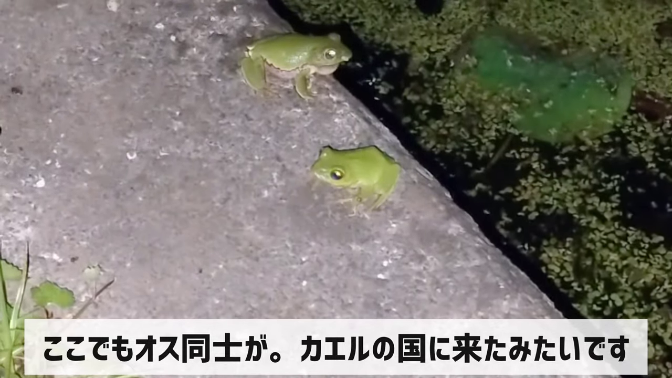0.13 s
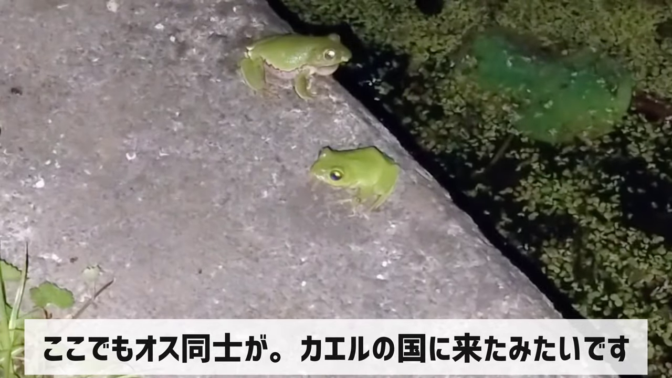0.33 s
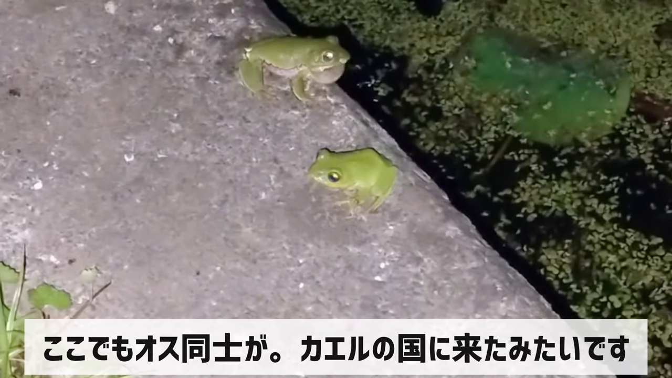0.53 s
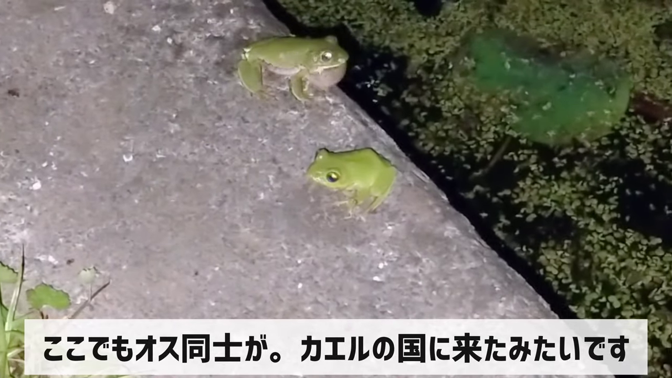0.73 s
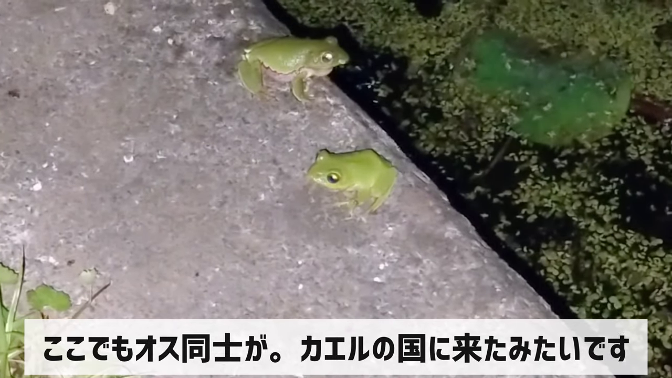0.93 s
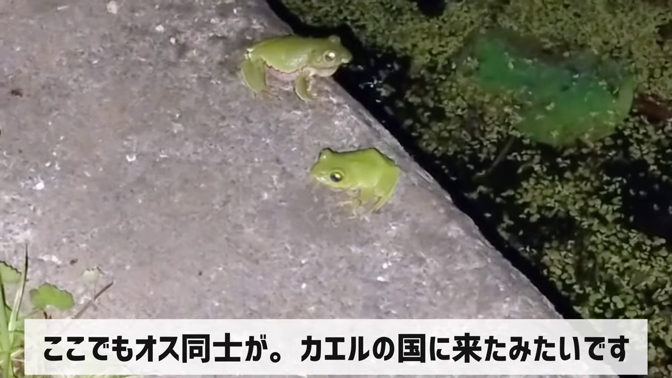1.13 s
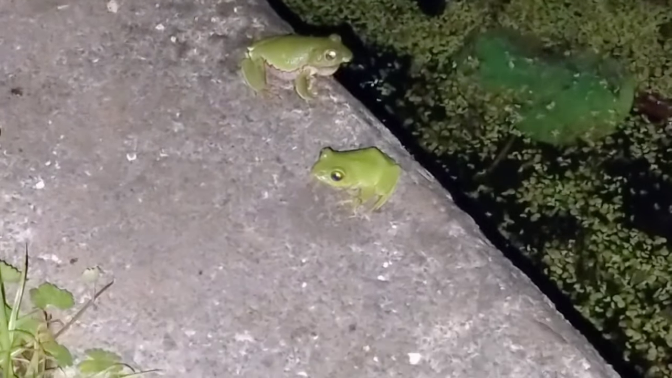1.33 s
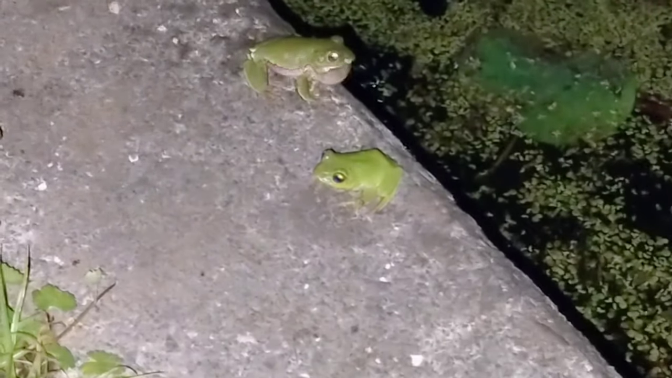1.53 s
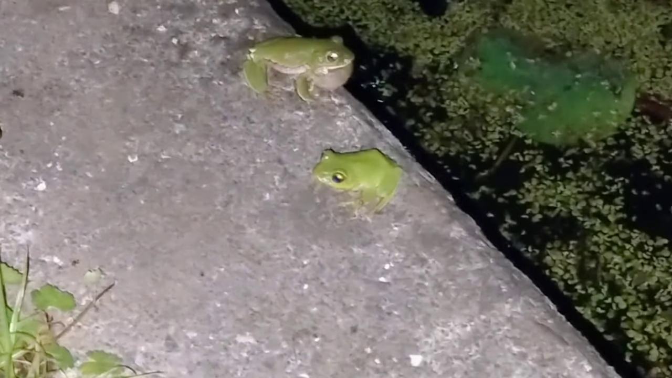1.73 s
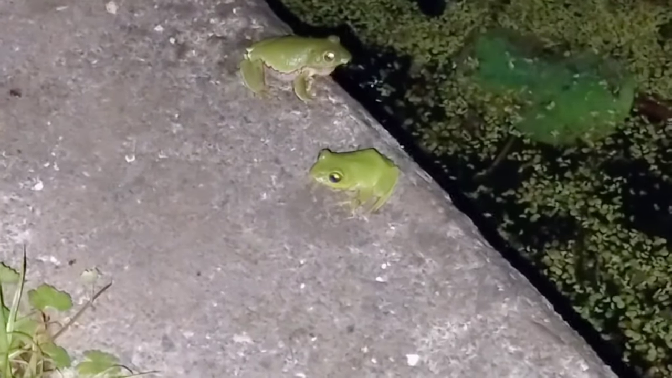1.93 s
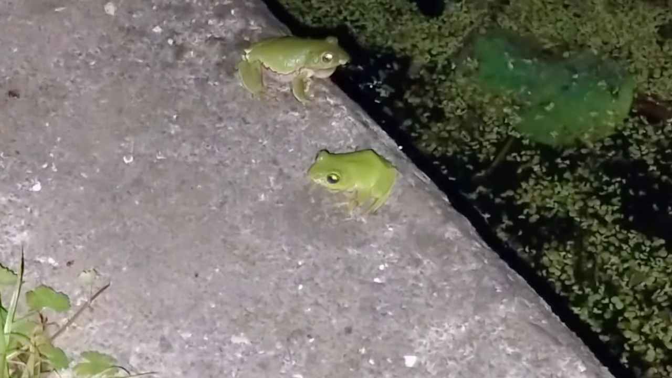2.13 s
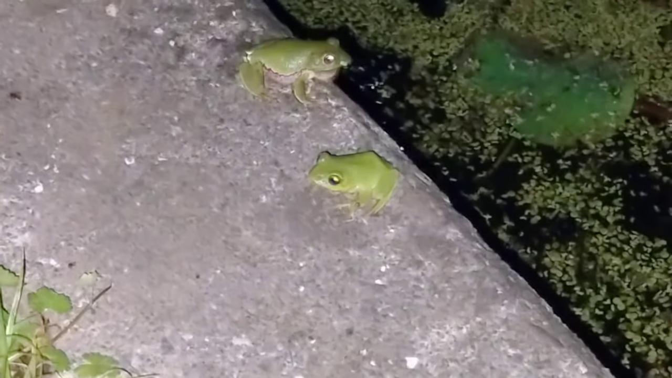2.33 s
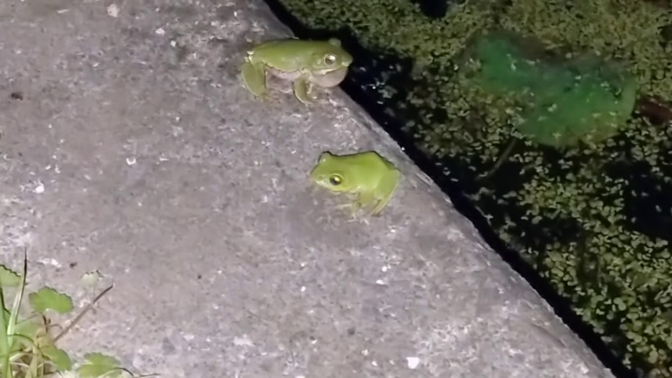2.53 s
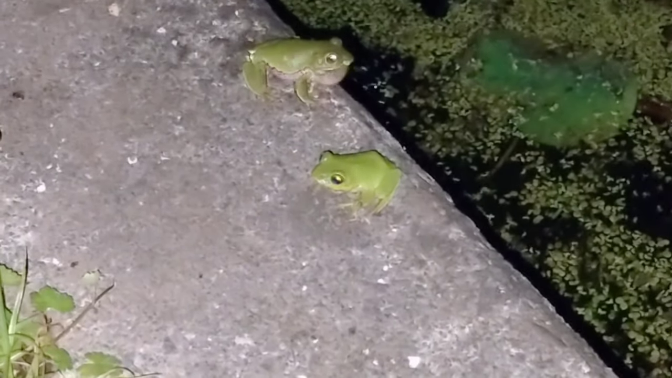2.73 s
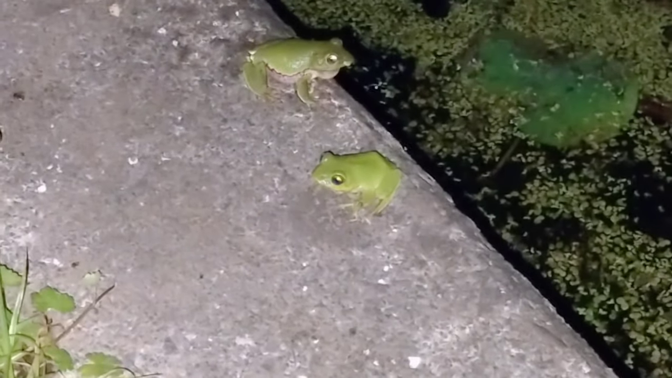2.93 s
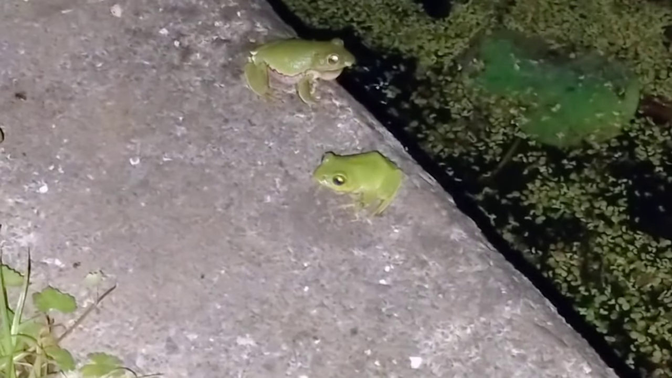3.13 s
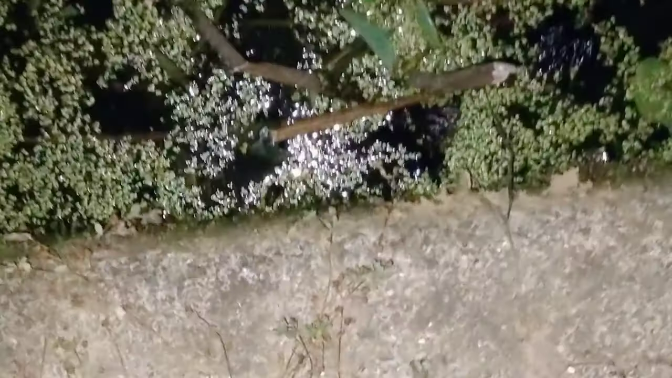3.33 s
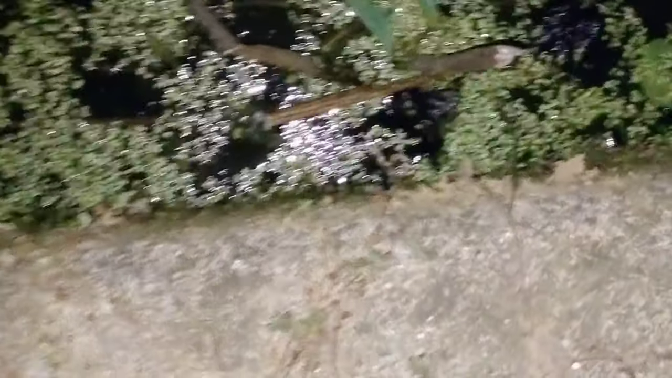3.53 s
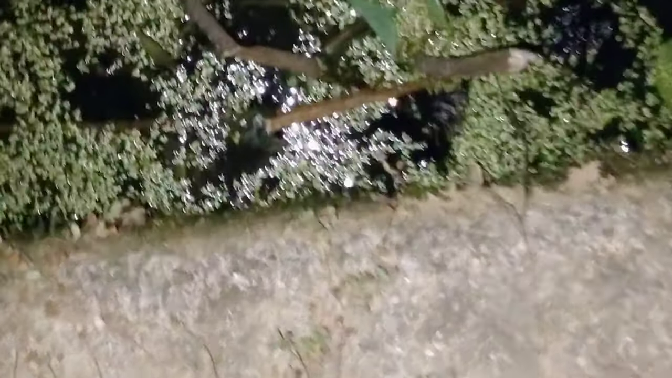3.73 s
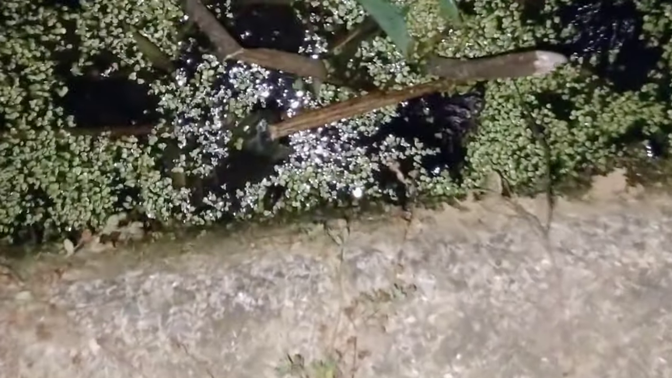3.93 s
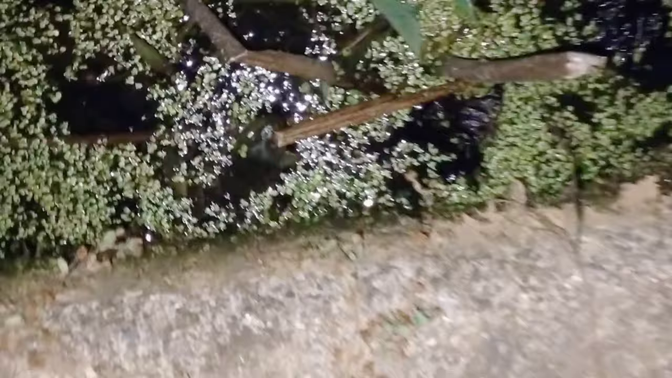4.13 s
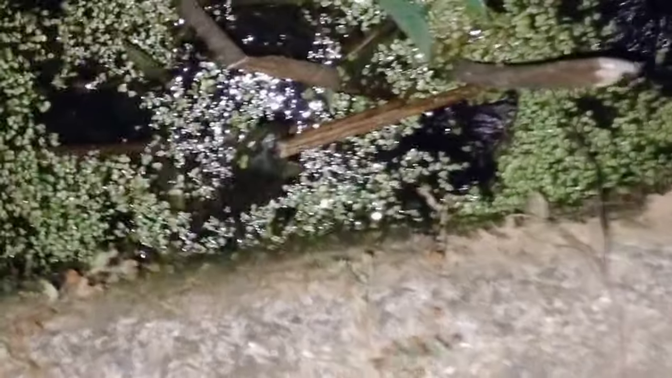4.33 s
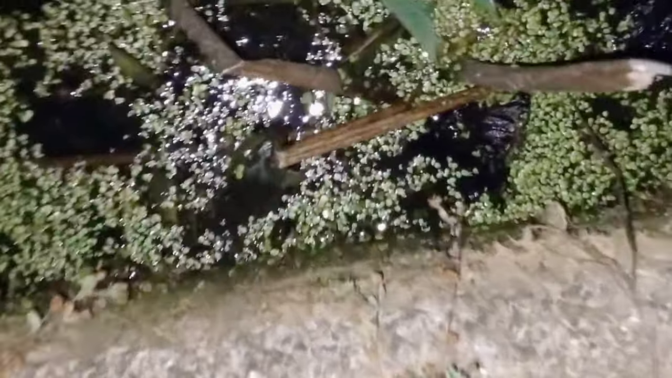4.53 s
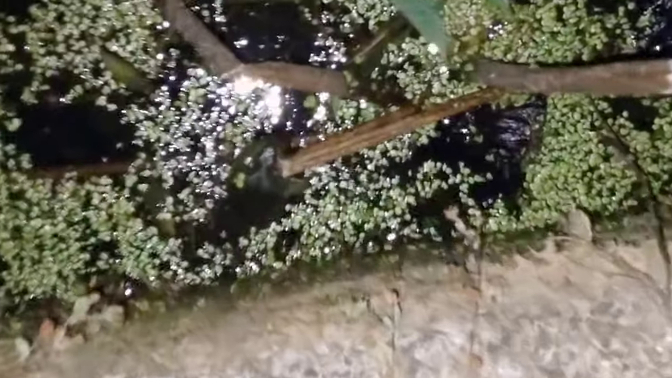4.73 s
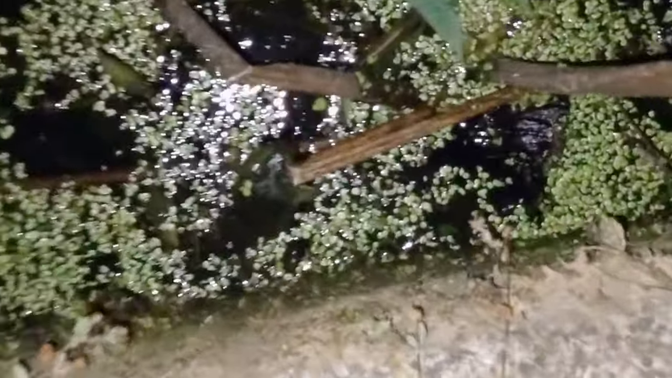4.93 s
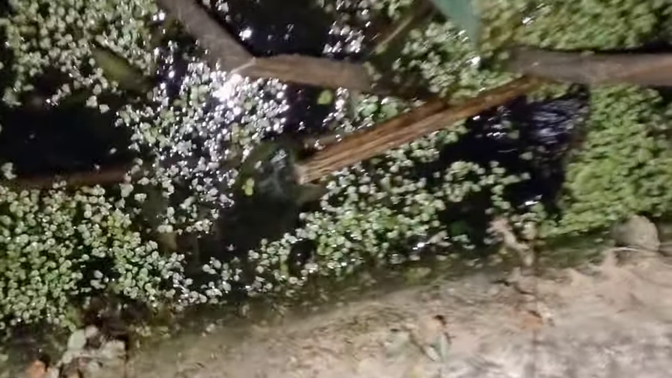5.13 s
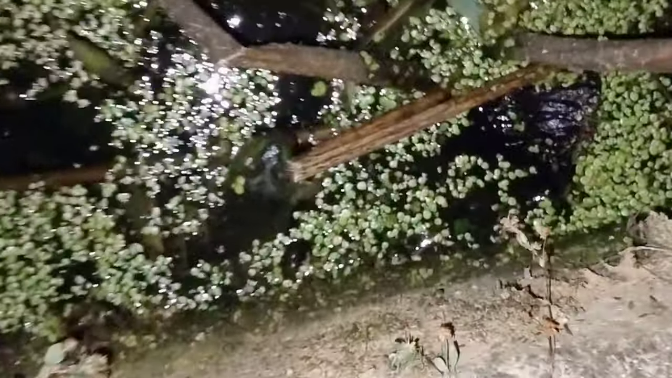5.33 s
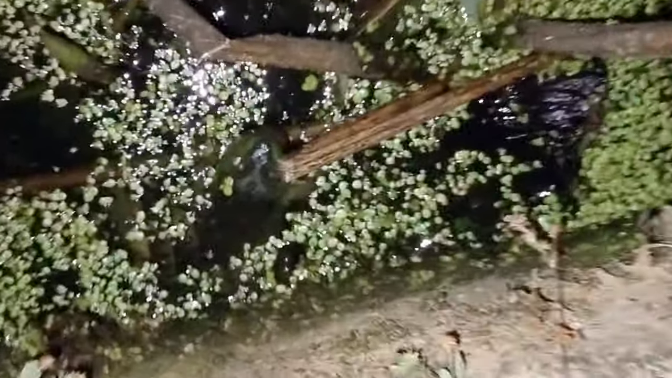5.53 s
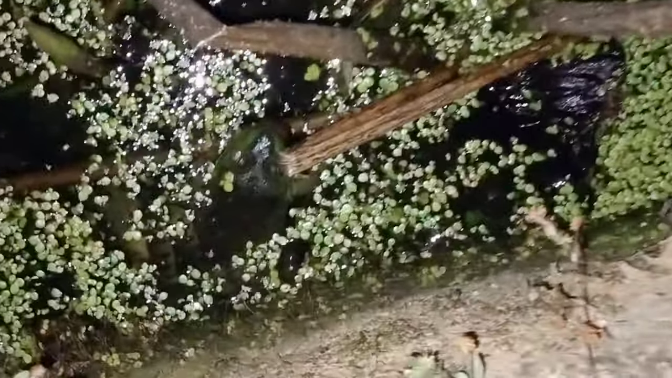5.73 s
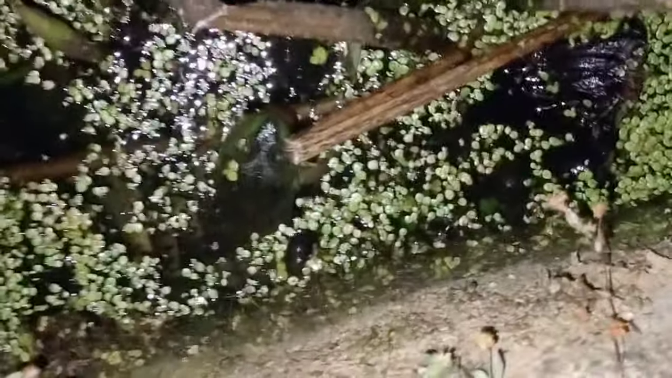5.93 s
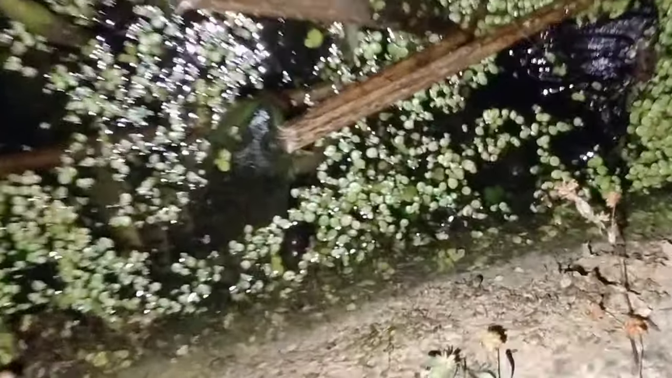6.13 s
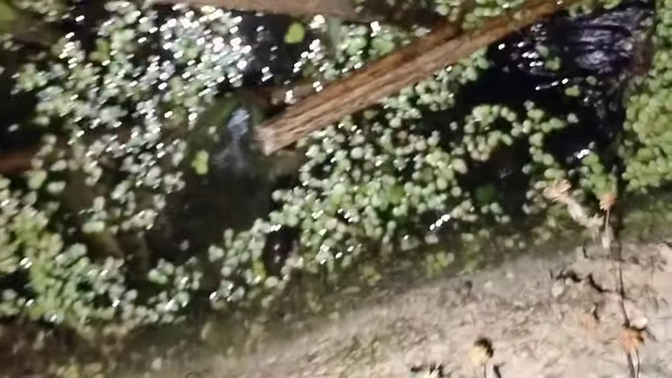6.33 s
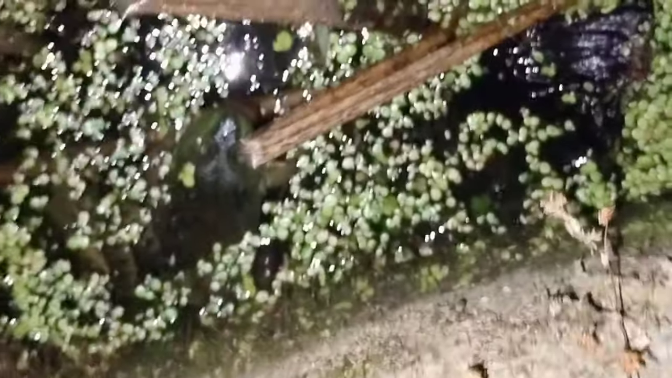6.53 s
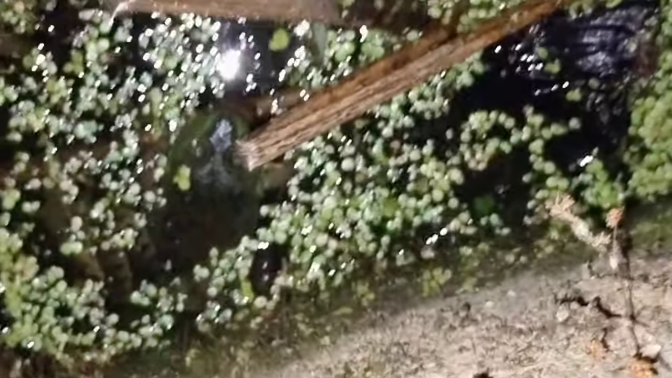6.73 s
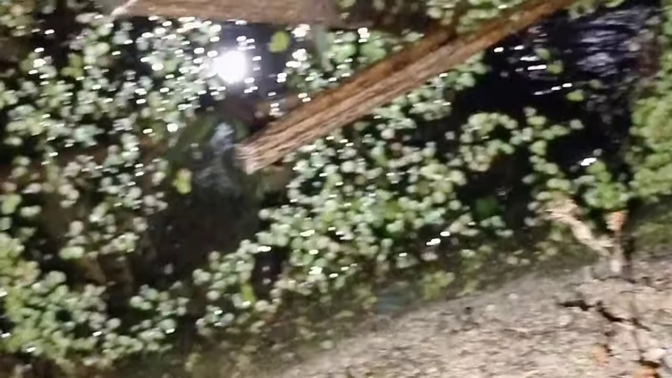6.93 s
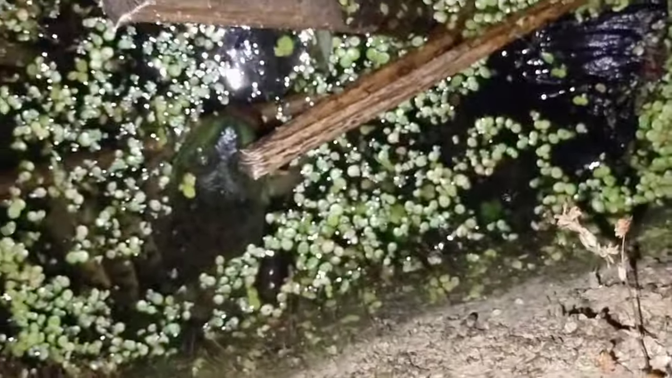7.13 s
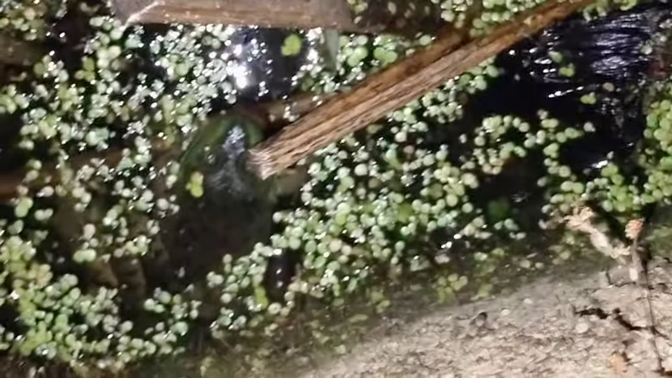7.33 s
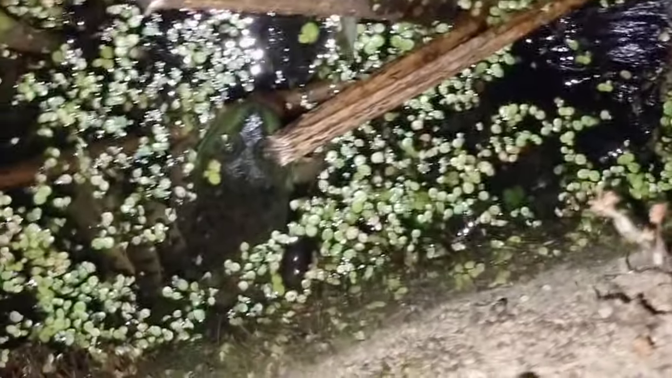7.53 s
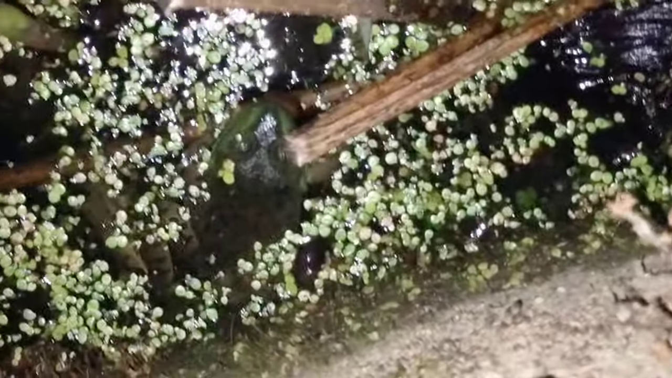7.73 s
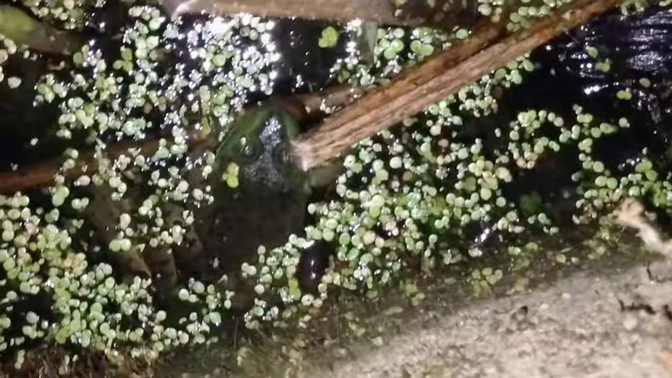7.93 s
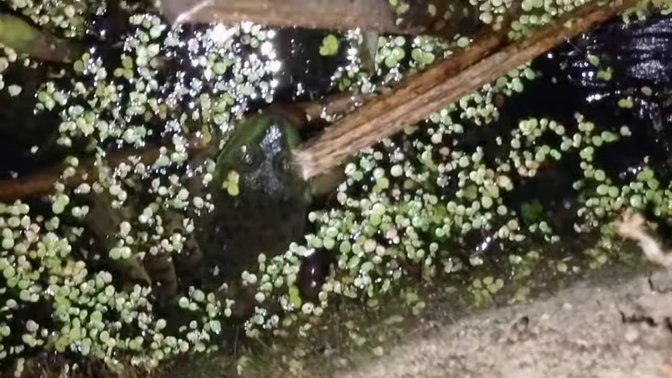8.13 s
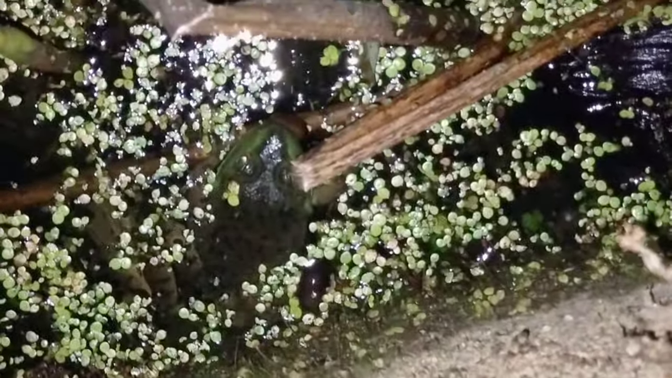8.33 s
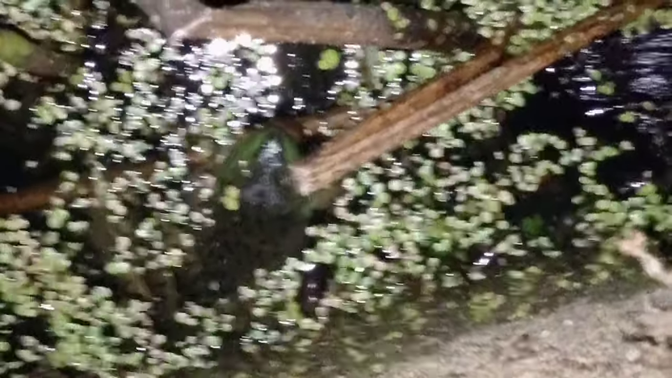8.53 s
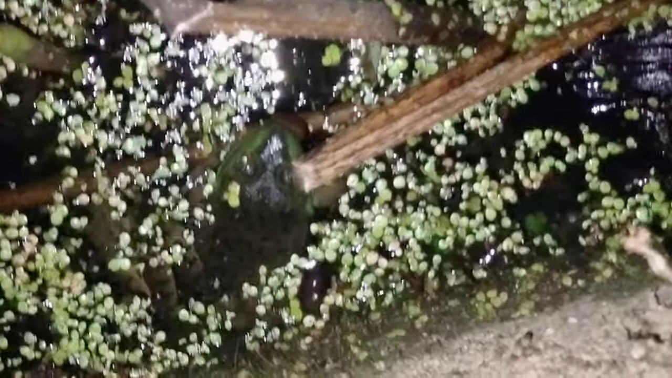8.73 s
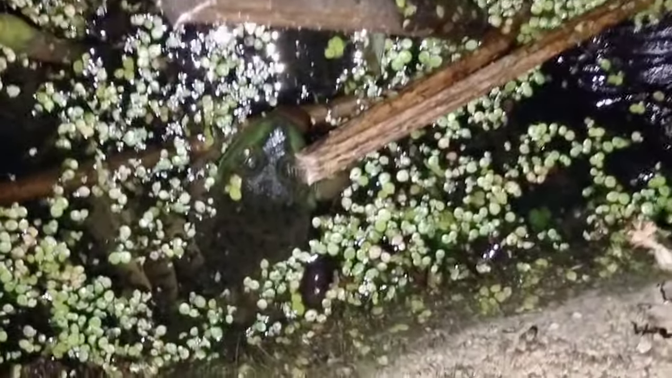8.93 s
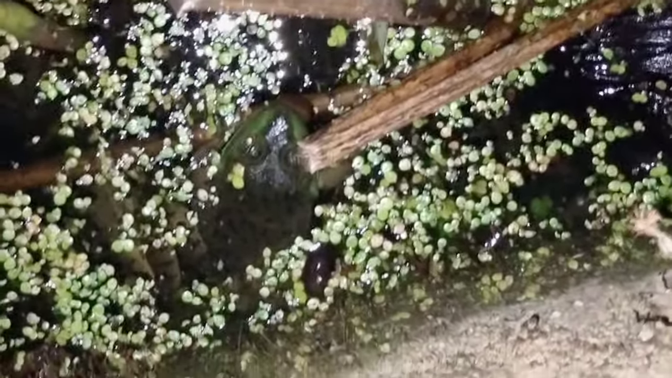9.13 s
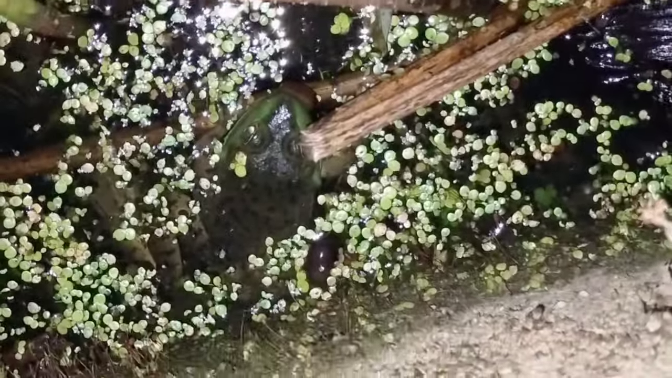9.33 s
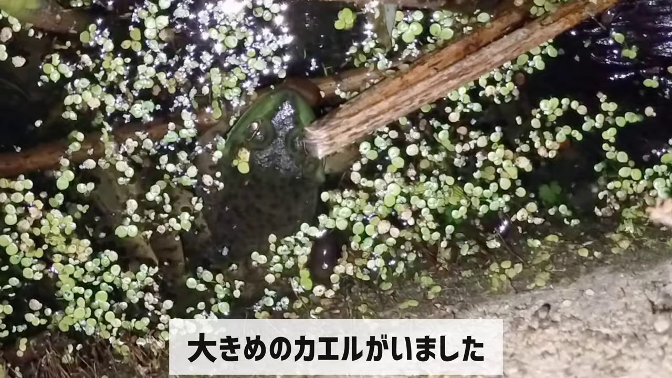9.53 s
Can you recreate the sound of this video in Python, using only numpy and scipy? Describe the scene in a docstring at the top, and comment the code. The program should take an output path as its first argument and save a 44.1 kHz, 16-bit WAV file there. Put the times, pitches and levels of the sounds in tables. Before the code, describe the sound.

A tree frog rattles loudly beside the microphone, a rival answering in its pauses, then the view shifts to neighbouring frogs over a dense night chorus.

```python
"""Night at a pond, first from its concrete bank: a tree frog rattles right at the microphone, a rival calls in his pauses.
Neighbours a few metres off join in, and a far chorus fills the air throughout, over still night air.
At 3.35 s a click marks the cut to a place over weedy water: a soft hiss and low rush swell and fade there,
among knocks, ticks, thumps and low notes; late on, a bigger frog calls once.
Every frog call is a train of short pulses, a sum of quickly dying vocal sac resonances."""
import sys
import numpy as np
from scipy import signal
from scipy.fft import rfft, irfft, next_fast_len
from scipy.io import wavfile
from scipy.ndimage import uniform_filter1d

SR = 44100
rng = np.random.default_rng(int(sys.argv[2]) if len(sys.argv) > 2 else 0)


def materialize(psi):
    """Save the field psi as 16-bit PCM at rate SR to the path in sys.argv[1].

    A 1-D psi becomes a single channel; in a 2-D psi each row is a channel.
    """
    bounded = np.clip(np.atleast_2d(psi).T, -1, 1)
    quanta = np.round(bounded * 32767).astype(np.int16)
    wavfile.write(sys.argv[1], SR, quanta)


N = 427329
TIME = np.arange(N) / SR

# All levels in the tables are before the trims set in the functions; a positive balance leans left.
# In every voice the first row is the main ring of the sac, and the others are tuned along with it.
WARM_UP_PULSES = 0.91  # a call's opening weakness shrinks by a factor e in this many pulses
SHORTEST_GAP_S = 0.025

# Calls of the male at the microphone: (first pulse [s], last pulse [s])
NEAR_CALLS = [(.3484, .5217), (1.3653, 1.5372), (2.3036, 2.464), (3.2374, 3.316)]
# The rhythm of all his calls: (time to the next pulse [s])
NEAR_GAPS = [.04, .038, .0468, .048]
NEAR_FULL_DB, START_WEAK_DB = -9.5, 4
NEAR_FULL_HZ, START_FLAT_HZ = 2373, 230


def near_pulses():
    """Rows of (time, effort, pitch): effort and pitch rise together as the sac fills."""
    rows = []
    for first_s, last_s in NEAR_CALLS:
        for k, s in enumerate(beats(first_s, last_s, NEAR_GAPS)):
            slack = np.exp(-k / WARM_UP_PULSES)
            effort_db = NEAR_FULL_DB - START_WEAK_DB * slack
            pitch_hz = NEAR_FULL_HZ - START_FLAT_HZ * slack
            rows.append((s, effort_db, pitch_hz))
    return rows


# His voice at full effort, sac resonances:
# (frequency [Hz], level [dB], rise [s], t60 [s], growth [dB per dB of effort], balance [dB])
NEAR_VOICE = [(2400, -4, 0.00065, .018, 2.2, 7.5), (2815, -9, 0.0006, 0.0064, 1.8, 17.5),
              (1657, -17.5, 0.00032, 0.013, 0.5, 6.5), (4820, -37.5, 0.0011, 0.013, -2.5, 11),
              (4570, -16.5, .0015, .014, 1.6, 8.5), (5530, -31.5, 0.00029, .01, 0.5, -2),
              (7080, -35, 0.0025, .011, -1.8, 3.5), (9300, -49.5, 0.0014, 0.011, -1.5, -2),
              (11650, -21.5, 0.002, 0.014, 2.8, 5), (12500, -33.5, 0.00094, 0.0089, 0, 7)]
# Weaker clicks that end a long call: (time [s], effort [dB], pitch [Hz])
CLOSING_CLICKS = [(0.5363, -11.5, 2370), (0.5583, -14.5, 2340), (1.5539, -12.5, 2410), (1.5706, -18, 2340),
                  (2.4739, -13, 2330)]
# The slackening sac rings hollower in the clicks:
# (frequency [Hz], level [dB], rise [s], t60 [s], growth [dB per dB of effort], balance [dB])
SLACK_VOICE = [(2385, -8.5, 0.0016, 0.018, 1.5, 6), (1568, -17, .0007, 0.018, -0.31, 7),
               (2880, -19, 0.00073, 0.0069, -1, 14), (3790, -29.5, 0.0013, 0.014, -0.82, 8),
               (4520, -25, .0012, 0.013, 1.5, 2), (5550, -26, 0.00049, 0.0064, 0, -6),
               (11200, -29.5, 0.0012, .007, 1.2, 1)]


def near_male(level_db, unfiltered_db):
    """Calls and closing clicks from the sac; a faint share of it is left unfiltered, which fills in the lows."""
    calls = close_frog(near_pulses(), NEAR_VOICE, full_db=NEAR_FULL_DB, delay_ms=0.2982, rasp=0.012)
    clicks = close_frog(CLOSING_CLICKS, SLACK_VOICE, full_db=-13, delay_ms=0.277, rasp=0.022)
    sac = hollowed(calls + clicks, notch_hz=1780, width_hz=84, depth=0.5)
    return from_db(level_db) * (radiated(sac, low_hz=1540, order=6) + from_db(unfiltered_db) * sac)


# Calls of the second male, in the near male's pauses: (first pulse [s], last pulse [s], first gap [s],
# level [dB], pitch [Hz], balance [dB], left delay [ms], brightness [dB])
RIVAL_CALLS = [(.004, .096, 0.041, -29, 2310, 6, 0.11, 1.5), (.978, 1.074, 0.04, -24.5, 2287, 7, .1, -2.5),
               (1.982, 2.086, 0.054, -28, 2330, 3, -.12, 2.5),
               (2.888, 3.032, 0.041, -28, 2330, 5, -0.13, -0.5)]
# His voice, sac resonances:
# (frequency [Hz], level [dB], rise [s], t60 [s], growth [dB per dB of brightness], balance [dB])
RIVAL_VOICE = [(2330, 0, 0.0013, 0.016, 0.5, -2), (1480, -19, 0.0014, 0.01, 2, 2),
               (3240, -19, 0.00087, 0.013, 1.5, 11), (4430, -21, 0.0013, 0.012, -1, 3),
               (5800, -22, .0015, .009, 0.5, -3), (10900, -34.5, 0.0021, 0.022, 1.5, 2)]


def rival():
    """The second male's sac, pulsed in slowing calls."""
    return slowing_calls(RIVAL_CALLS, RIVAL_VOICE, level_db=7.0, echo_db=-14.5, uneven_db=2.3, pitch_jitter=0.016)


# Pulses of the bigger frog's one call: (time [s], effort [dB], pitch [Hz])
BIG_PULSES = [(8.6638, -21, 2080), (8.7113, -16, 2000), (8.7571, -15, 2024), (8.7655, -24, 1840)]
# Its voice, sac resonances:
# (frequency [Hz], level [dB], rise [s], t60 [s], growth [dB per dB of effort], balance [dB])
BIG_VOICE = [(2038, 0.5, 0.0015, 0.0086, 1.8, 3), (1327, -26.5, 0.00083, 0.012, -0.8, 3.5),
             (3690, -26, 0.0027, 0.02, 1.5, 2), (2960, -31, 0.00067, 0.0064, -0.6, 2),
             (4200, -34, 0.0017, 0.014, -0.55, 2), (5830, -27.5, 0.0019, 0.017, 2, 3)]


def big_frog(level_db):
    """A larger sac with a lower main ring."""
    sac = close_frog(BIG_PULSES, BIG_VOICE, full_db=-14.5, delay_ms=0.063, rasp=0.015)
    return from_db(level_db) * radiated(sac, low_hz=1230)


# Calls of frogs a few metres off: (first pulse [s], last pulse [s], first gap [s],
# level [dB], pitch [Hz], balance [dB], left delay [ms], brightness [dB])
NEIGHBOUR_CALLS = [(.77, .863, 0.048, -38, 2050, 10, .22, 5.5),
                   (1.205, 1.291, 0.033, -29.5, 2420, 16, .15, -4),
                   (1.762, 1.854, .042, -39, 1880, 7, 0.22, 11),
                   (1.79, 1.876, 0.047, -32, 2450, 15, 0.1, 5), (2.127, 2.163, .04, -34, 2180, 11, .24, 8),
                   (2.549, 2.593, .044, -28.5, 2460, 16, 0.16, 2.5),
                   (2.669, 2.759, 0.047, -31, 1965, 4.5, 0.25, 10.5),
                   (3.295, 3.397, 0.062, -28.5, 2270, 10, 0.075, 4),
                   (3.452, 3.571, 0.049, -30, 2410, 2, -0.043, 7),
                   (4.32, 4.55, 0.055, -29, 2110, 7, -0.18, -0.5),
                   (4.642, 4.875, .053, -31.5, 2354, 14, -.05, 5),
                   (5.4, 5.583, .054, -34, 2430, 17, 0.088, -5),
                   (5.824, 5.884, 0.067, -31, 2278, 15, -0.14, 4.5),
                   (5.977, 6.139, 0.055, -31, 2343, 2, -0.061, 4.5),
                   (6.256, 6.488, .054, -24.5, 2150, 1, -0.091, -5),
                   (6.68, 6.862, 0.054, -30, 2339, 9, 0.004, -18),
                   (6.916, 6.959, 0.049, -31.5, 2320, 7, -0.0011, 1),
                   (7.015, 7.172, .055, -30.5, 2304, 6, -0.13, 7.5),
                   (7.43, 7.55, 0.062, -28, 2310, 8, 0.13, 4),
                   (7.686, 7.874, 0.057, -29.5, 2270, 5, 0.074, -9),
                   (7.98, 8.067, 0.04, -30.5, 2280, 10, -0.11, 5.5),
                   (8.15, 8.336, .055, -26, 2083, 1.5, -0.15, -1.5),
                   (8.186, 8.298, .061, -28, 2330, 6, -0.073, 3),
                   (9.137, 9.366, 0.049, -28.5, 2268, 5, 0.12, 5.5),
                   (9.273, 9.318, .045, -33.5, 1940, 0, 0.11, 8.5),
                   (9.656, 9.71, 0.053, -27.5, 2323, 7, .04, -4)]
# The voice of neighbours and far chorus, sac resonances:
# (frequency [Hz], level [dB], rise [s], t60 [s], growth [dB per dB of brightness], balance [dB])
COMMON_VOICE = [(2257, 1, 0.0013, 0.018, 0, 1.5), (1486, -24, 0.0015, .016, 1, 1),
                (3164, -26, 0.00073, 0.0077, 1.5, -4.5), (4315, -22.5, 0.0017, 0.011, 1.5, 1.5),
                (5100, -22, 0.002, 0.0085, 1.5, -3.5)]


def neighbours():
    """Frogs around the microphone sharing one voice at various pitches."""
    return slowing_calls(NEIGHBOUR_CALLS, COMMON_VOICE, level_db=7.5, echo_db=-9.0, uneven_db=0.3,
                         pitch_jitter=0.013)


# How these calls slow down: (gap [multiple of the first])
SLOWING = [1, 1.12, 1.17, 1.2]
FIRST_PULSE_WEAK_DB = 1.5


def slowing_calls(calls, voice, level_db, echo_db, uneven_db, pitch_jitter):
    """Each call has its own direction, swells and slows; every pulse is followed by a weaker after-pulse."""
    out = np.zeros((2, N))
    for first_s, last_s, gap_s, db, hz, balance_db, delay_ms, bright_db in calls:
        ears = panned(balance_db)
        ears = ears / np.sqrt(np.mean(ears ** 2))
        for k, s in enumerate(beats(first_s, last_s, gap_s * np.array(SLOWING))):
            loud, sharp = rng.standard_normal(2)
            weak_db = FIRST_PULSE_WEAK_DB * np.exp(-k / WARM_UP_PULSES)
            gain = from_db(db + level_db + uneven_db * loud - weak_db)
            pitch_hz = hz * (1 + pitch_jitter * sharp)
            sound = gain * ears * pulse(voice, pitch_hz, bright_db, delay_ms, vary_db=3.5, rasp=0.017)
            add(out, s, sound)
            add(out, s + rng.uniform(0.0054, 0.016), from_db(echo_db) * sound)
    return out


def close_frog(pulses, voice, full_db, delay_ms, rasp):
    """A single caller; effort below full changes each resonance by its own growth, and so the timbre."""
    out = np.zeros((2, N))
    for s, db, hz in pulses:
        add(out, s, pulse(voice, hz, db - full_db, delay_ms, vary_db=-1.0, rasp=rasp))
    return out


def pulse(voice, pitch_hz, effort_db, delay_ms, vary_db, rasp, glide=0.0068, glide_s=0.0027):
    """One snap of the larynx: raspy resonances swell, slide slightly upward and die, delayed to one ear."""
    hz, db, rise, t60, growth, balance_db = np.transpose(voice)[:, :, None, None]
    ear_delay_s = np.maximum([[delay_ms], [-delay_ms]], 0) / 1000
    t = np.maximum(np.arange(SR // 32) / SR - ear_delay_s, 0)
    main_hz = voice[0][0]
    # the side resonances vary from pulse to pulse
    loud, sharp = rng.standard_normal((2,) + hz.shape) * (hz != main_hz)
    strength = from_db(db + growth * effort_db + vary_db * loud) * panned(balance_db)
    swell = (1 - np.exp(-(t / rise) ** 2)) * from_db(-60 * t / t60)
    tuned_hz = hz * (1 + 0.011 * sharp) * pitch_hz / main_hz
    cycles = tuned_hz * t * (1 + glide * np.tanh(t / glide_s - 1))
    ring = np.sum(strength * swell * np.sin(2 * np.pi * cycles), axis=0)
    return ring * (1 + rasp * rng.standard_normal(t.shape))


def beats(first_s, last_s, gaps_s):
    """Pulse times of one call: it keeps its rhythm until the last pulse, which may come early or late."""
    s = first_s + np.cumsum([0, *gaps_s])
    return np.append(s[s < last_s - SHORTEST_GAP_S], last_s)


def hollowed(x, notch_hz, width_hz, depth):
    """The two lowest resonances of the sac cancel between their peaks."""
    b, a = signal.iirpeak(notch_hz, notch_hz / width_hz, fs=SR)
    return x - np.clip(depth, 0, 1) * signal.lfilter(b, a, x)


def radiated(x, low_hz, order=10):
    """A small sac radiates almost nothing below its lowest resonance."""
    return signal.sosfilt(signal.butter(order, low_hz, "high", fs=SR, output="sos"), x)


def surroundings(x, t60):
    """Scatter from banks and plants: a short diffuse tail, different in each ear."""
    t = np.arange(SR // 2) / SR
    tail = rng.standard_normal((2, len(t))) * from_db(-60 * t / t60) * (t > 0.004)
    return signal.fftconvolve(x, tail / np.sqrt(np.sum(tail ** 2) / 2), axes=1)[:, :N]


# Level of the far chorus: (time [s], level [dB])
CHORUS_LEVEL = [(0.0, -46), (0.57, -45), (0.83, -46), (1.38, -45), (3.02, -45.5), (3.4, -43), (3.7, -46),
                (5.94, -47), (6.23, -45.5), (7.5, -47.5), (8.2, -46), (9.69, -47)]
# Its colour from the bank and over the pond: (frequency [Hz], level [dB per Hz])
FROM_BANK = [(1000, -43), (1400, -21), (1750, -16), (2050, -0.5), (2300, 1.5), (2700, -17), (3600, -25.5),
             (4400, -20), (5100, -31.5), (6300, -34.5), (8000, -49), (9600, -46.5), (11000, -40.5),
             (13000, -48)]
OVER_POND = [(1000, -40), (1350, -22), (1750, -16), (2050, 0), (2300, 0), (2520, -5), (2850, -23.5),
             (3400, -32.5), (4300, -23.5), (5400, -31.5), (6500, -37.5), (8000, -46.5), (11000, -45.5),
             (13000, -47.5)]
# Its balance in both places, mostly to the left: (frequency [Hz], balance [dB])
BANK_BALANCE = [(1000, -0.5), (2100, 2), (2700, 14.5), (4400, 12.5), (5100, 4)]
POND_BALANCE = [(1000, 1.3), (2300, 4.4), (8000, 0.57)]


def far_chorus(level_db, pitch_spread, distance_db, wet_db, blur_db, count=44):
    """Dozens of frogs, each at its own pitch and pace, rattle again and again; the farthest blur into a band."""
    out = np.zeros((2, N))
    for frog in range(count):
        pitch, loud, side = np.clip(rng.standard_normal(3), -1.7, 1.7)
        pitch_hz = 2250 * np.exp(pitch_spread * pitch)
        sound = pulse(COMMON_VOICE, pitch_hz, 0, rng.uniform(-0.4, 0.41), vary_db=4.5, rasp=0.017)
        sound = sound * from_db(distance_db * loud) * panned(3 * side)
        pace_s = rng.uniform(0.04, 0.062)
        # a new seven-pulse call every 0.6 to 1 s
        for start in np.cumsum(rng.uniform(0.6, 1, size=15)) - 1 - rng.random():
            steps = np.cumsum(pace_s * rng.uniform(0.85, 1.15, size=7))
            for s, db in zip(start + steps, rng.normal(0, 3.74, size=7)):
                add(out, s, from_db(db) * sound)
    out = rms_one(out + from_db(wet_db) * surroundings(out, t60=0.53))
    out = out + from_db(blur_db) * noise(0)
    bank = leaning(coloured(out, FROM_BANK, flatten=True), BANK_BALANCE)
    pond = leaning(coloured(out, OVER_POND, flatten=True), POND_BALANCE)
    moved = over_pond()
    return from_db(in_time(CHORUS_LEVEL)[0] + level_db) * ((1 - moved) * bank + moved * pond)


MOVE_S = 3.35


def over_pond():
    """0 on the bank, 1 over the water, with a 10 ms crossfade."""
    return np.clip((TIME - MOVE_S) * 100, 0, 1)


# Knocks, plops, ticks and thumps; the first is the click of the cut between the two places:
# (time [s], level [dB], frequency [Hz], reach to either side [octaves], t60 [s], balance [dB])
KNOCKS = [(3.349, -39.5, 600, 2.4, 0.024, 10), (3.972, -47.5, 400, 1.1, 0.02, 1),
          (5.143, -54.5, 360, 0.52, 0.044, 2), (5.146, -54, 710, 0.24, 0.023, 6),
          (5.582, -53.5, 340, 1.3, 0.062, 0), (7.842, -55, 495, 0.23, 0.024, 0),
          (7.9154, -32.5, 14400, 1.85, 0.0049, -19), (7.919, -56, 67, 0.7, 0.088, 8),
          (8.3317, -55, 13000, 0.76, .005, 1), (8.338, -51, 43, 0.85, 0.055, 3)]


def click_and_knocks(level_db):
    """Short dying bursts of noise in one band each."""
    out, t = np.zeros((2, N)), np.arange(SR // 3) / SR
    for s, db, hz, octaves, t60, balance_db in KNOCKS:
        edges_hz = [hz / 2 ** octaves, min(hz * 2 ** octaves, SR * 0.45)]
        band = signal.butter(2, edges_hz, "band", fs=SR, output="sos")
        burst = signal.sosfilt(band, rng.standard_normal(len(t)) * from_db(-60 * t / t60))
        add(out, s, from_db(db + level_db) * panned(balance_db) * burst / abs(burst).max())
    return out


# Faint low notes and one rising gurgle: (time [s], length [s], start [Hz], end [Hz],
# level [dB], throbs [per s])
LOW_NOTES = [(3.36, 0.18, 520, 506, -69, 23), (3.645, .27, 510, 461, -64.5, 11),
             (5.175, 0.347, 430, 422, -67, 26.3), (6.304, 0.057, 240, 520, -53, 4.9)]


def low_notes(waver):
    """Soft throbbing sine glides with an unsteady pitch."""
    out = np.zeros((2, N))
    for s, length, start_hz, end_hz, db, throbs in LOW_NOTES:
        t = np.arange(int(length * SR)) / SR
        unsteady = rms_one(uniform_filter1d(rng.standard_normal(SR), size=150))[:len(t)]
        hz = np.interp(t, [0, length], [start_hz, end_hz]) * (1 + waver * unsteady)
        throb = np.cos(np.pi * throbs * (t - length / 2)) ** 2
        swell = np.sqrt(np.sin(np.pi * t / length)) * throb
        add(out, s, from_db(db) * panned(1) * swell * np.sin(2 * np.pi * np.cumsum(hz) / SR))
    return out


# Swell of hiss and rush, of which only the shape below its peak is used: (time [s], level [dB])
HISS_LEVEL = [(3.4, -79), (3.49, -78), (4.9, -78.5), (5.94, -76.5), (6.27, -72.5), (8.02, -80),
              (8.39, -82.5), (9.69, -88)]
# Colour of the soft hiss and of the low rush: (frequency [Hz], level [dB per Hz])
HISS_COLOUR = [(1500, -17), (3500, -5), (5400, 5), (7000, -9), (9000, -16.5), (12000, -16.5), (15000, -7),
               (16500, -29)]
RUSH_COLOUR = [(35, -3), (70, 3.5), (110, -7.5), (420, -3.5), (600, -11), (1000, -13), (4000, -51)]
HISS_PEAK_DB, RUSH_PEAK_DB = -57, -66
HISS_FOLLOWS, RUSH_FOLLOWS = 1.48, 1.7  # dB per dB of the swell


def water_hiss():
    """Soft hiss and low rush, coloured noises that swell together over the water."""
    swell_db, = in_time(HISS_LEVEL)
    swell_db = swell_db - swell_db.max()
    hiss = from_db(HISS_PEAK_DB + HISS_FOLLOWS * swell_db) * coloured(noise(0), HISS_COLOUR) * panned(3.7)
    rush = from_db(RUSH_PEAK_DB + RUSH_FOLLOWS * swell_db) * coloured(noise(0.91), RUSH_COLOUR)
    return over_pond() * (hiss + rush)


# Colour of the still night air: (frequency [Hz], level [dB per Hz])
AIR = [(15, -5), (42, 0.5), (52, -0.5), (68, 3), (90, -3.5), (150, -6.5), (260, -11), (500, -18.5),
       (1000, -21), (4000, -38), (16000, -37)]


def night_air(level_db):
    """Steady, mostly low noise, much alike in both ears."""
    return from_db(level_db) * coloured(noise(0.7), AIR) * panned(0.98)


def from_db(db):
    """Decibels to gain."""
    return 10 ** (np.asarray(db) / 20)


def rms_one(x):
    """Scale to rms 1."""
    return x / np.sqrt(np.mean(x ** 2) + 1e-20)


def in_time(rows):
    """Each column of a curve at every sample."""
    s, *columns = np.transpose(rows)
    return [np.interp(TIME, s, c) for c in columns]


def panned(balance_db):
    """Left and right gains."""
    return from_db(np.array([[0.5], [-0.5]]) * balance_db)


def add(out, s, sound):
    """Mix a short stereo sound in at a given time."""
    i = int(round(s * SR))
    if 0 <= i < N:
        out[:, i:i + sound.shape[1]] += sound[:, :N - i]


def noise(likeness):
    """White stereo noise with the given left-right correlation."""
    mid, side = rng.standard_normal((2, N))
    likeness = np.clip(likeness, -1, 1)
    return np.sqrt(1 + likeness) * mid + np.sqrt(1 - likeness) * side * np.array([[1], [-1]])


def coloured(x, points, flatten=False):
    """Causal filter through (Hz, dB) points, on request evening out the sound's own colour first; rms 1."""
    size = 2 * next_fast_len(N // 2 + 4096)
    spectrum, hz = rfft(x, size), np.arange(size // 2 + 1) * SR / size
    at, db = np.transpose(points)
    gain = from_db(np.interp(np.log(hz + 1), np.log(at), db))
    if flatten:
        own_power = uniform_filter1d(np.mean(abs(spectrum) ** 2, axis=0), size=1500)
        # the last factor spares the lows below the first point from being raised
        gain = gain / np.sqrt(abs(own_power) + 1e-12) / (1 + (at[0] * 0.65 / (hz + 50)) ** 4)
    # half the cepstrum gives the minimum-phase filter
    cepstrum = irfft(np.log(gain))[:size // 2]
    return rms_one(irfft(spectrum * np.exp(2 * rfft(cepstrum, size)))[:, :N])


def leaning(x, points):
    """Shift each frequency toward one ear by (Hz, dB) points, keeping its power."""
    size = next_fast_len(N)
    hz = np.arange(size // 2 + 1) * SR / size
    gains = panned(np.interp(hz, *np.transpose(points)))
    return irfft(rfft(x, size) * gains / np.sqrt(np.mean(gains ** 2, axis=0)), size)[:, :N]


def scene():
    """Near callers, their scatter, the far chorus, the small sounds and the background."""
    near = near_male(level_db=0.5, unfiltered_db=-21.5)
    big = big_frog(level_db=-1.0)
    around = radiated(rival() + neighbours(), low_hz=1150)
    sent = from_db(-25.5) * near + from_db(-9.5) * big + from_db(-9) * around
    scatter = surroundings(sent, t60=0.087)
    chorus = far_chorus(level_db=4.0, pitch_spread=0.071, distance_db=2.0, wet_db=-3, blur_db=-22.5)
    frogs = near + big + around + scatter + chorus
    small_sounds = click_and_knocks(level_db=-0.5) + low_notes(waver=0.11)
    return frogs + small_sounds + water_hiss() + night_air(level_db=-69.5)


def record(dry):
    """The microphone signal, cut steeply above 16 kHz."""
    return signal.sosfilt(signal.ellip(10, 0.1, 80, 16000, fs=SR, output="sos"), dry)


dry = scene()
out = record(dry)
materialize(out)
```